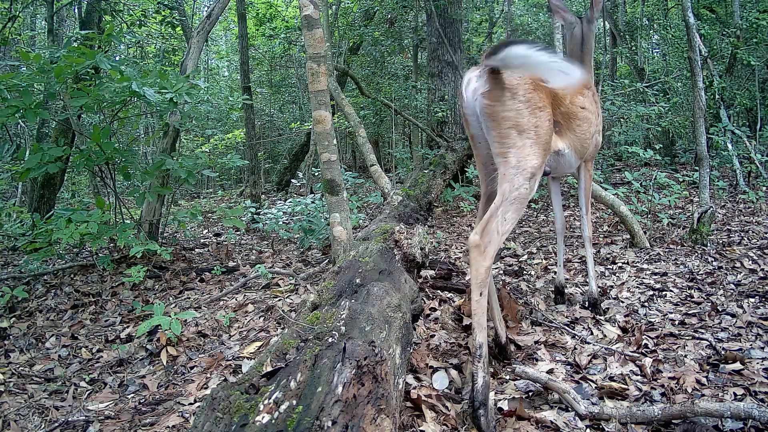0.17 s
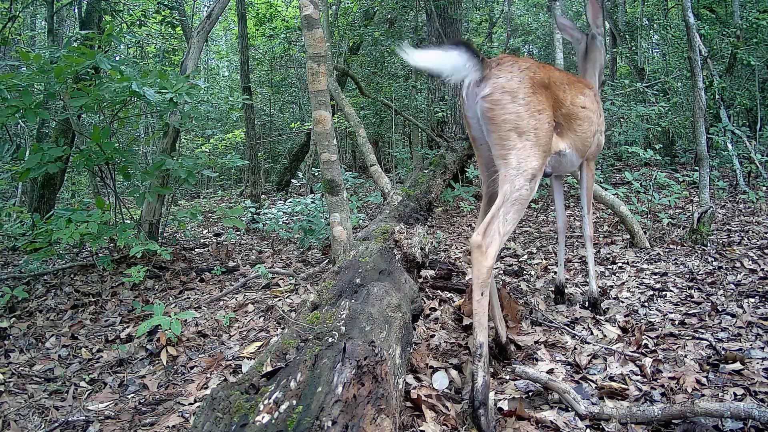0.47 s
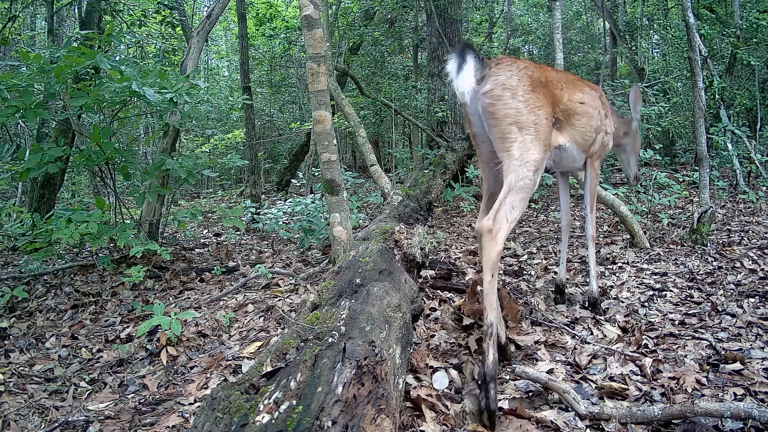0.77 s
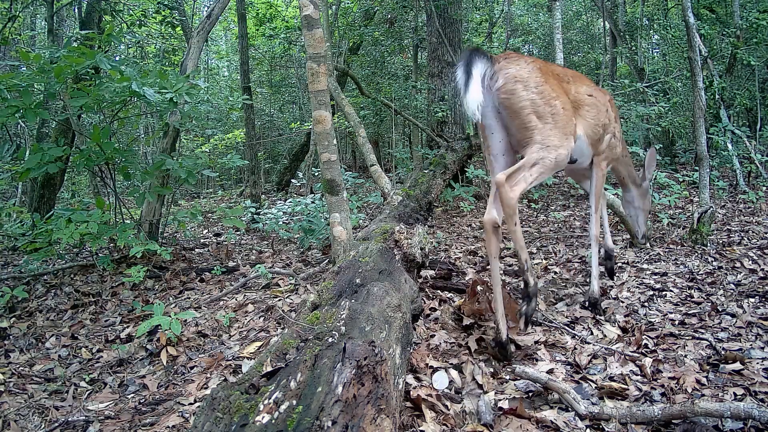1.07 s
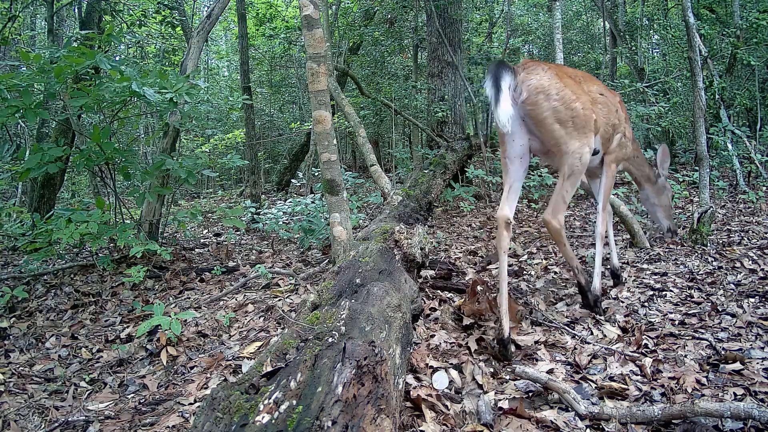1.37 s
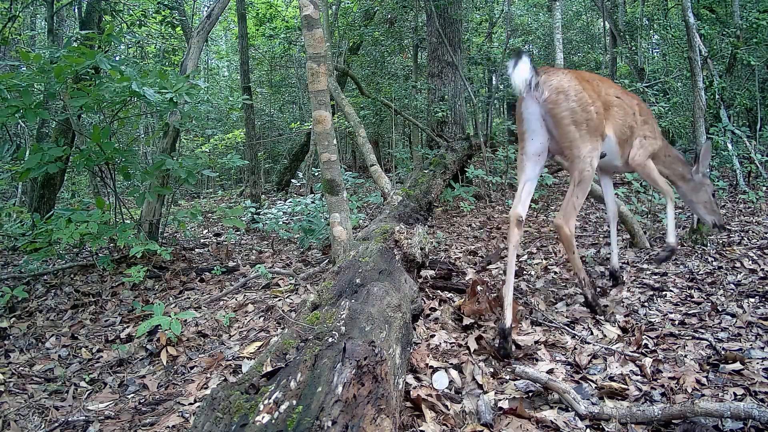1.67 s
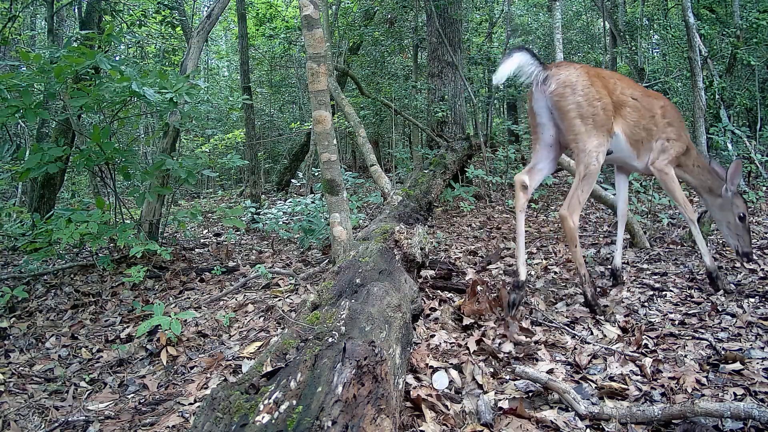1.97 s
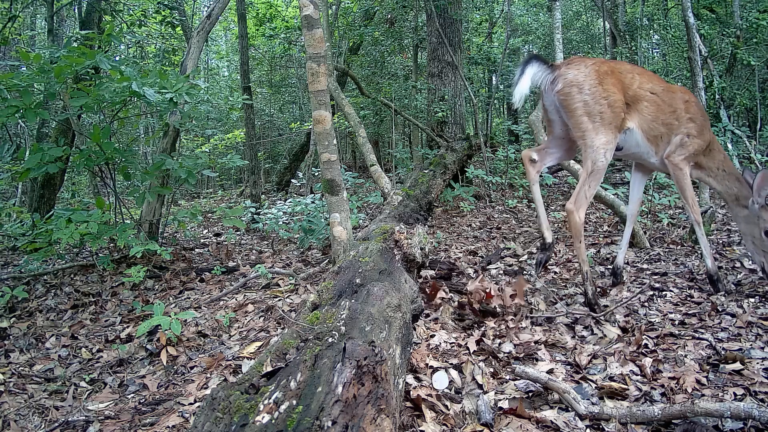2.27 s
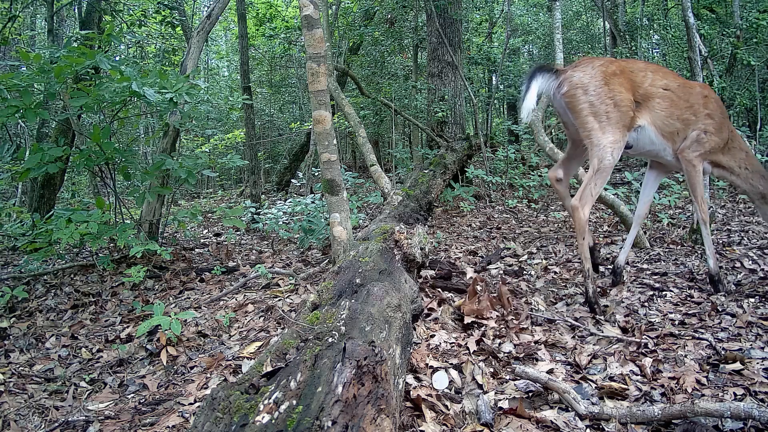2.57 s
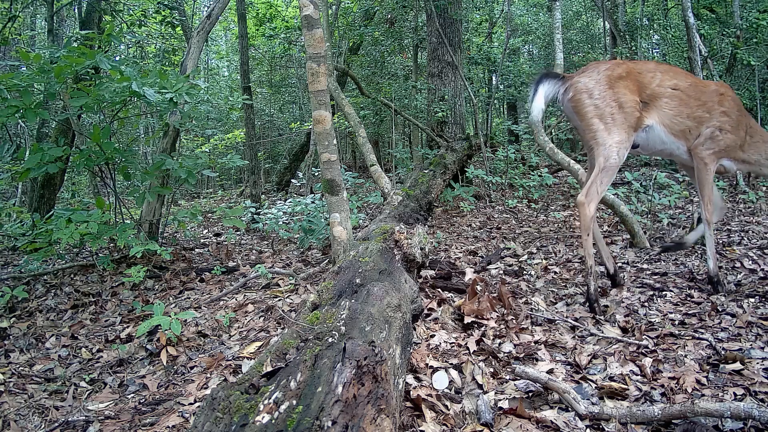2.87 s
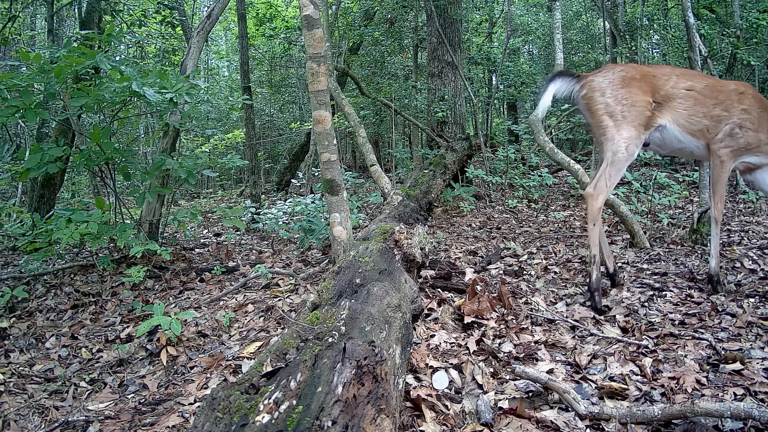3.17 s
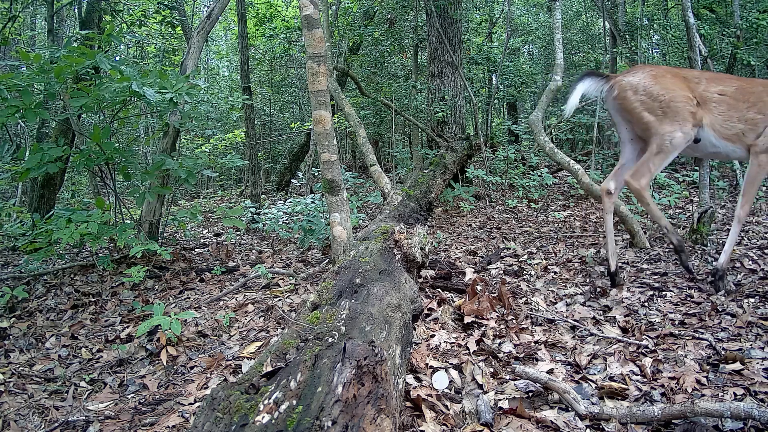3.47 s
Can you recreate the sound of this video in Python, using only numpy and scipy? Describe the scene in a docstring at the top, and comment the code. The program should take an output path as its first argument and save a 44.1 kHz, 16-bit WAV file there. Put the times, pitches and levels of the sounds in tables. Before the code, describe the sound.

Deer hooves crunch dry leaves and snap twigs over a low distant drone.

```python
"""Deer walking off over dry leaf litter

Hooves press filtered grains and tiny rings of leaf crackle; twigs snap as click, ring and dull body; wood knocks.
Far insects hiss as narrow noise over forest air, with an engine-like drone of wavering sines and noise rumble.
A thin, electronic-sounding whine of high partials creeps up in pitch."""
import sys
import numpy as np
from scipy import signal
from scipy.fft import rfft, irfft, next_fast_len
from scipy.io import wavfile
from scipy.ndimage import map_coordinates

SR = 44100
rng = np.random.default_rng(int(sys.argv[2]) if len(sys.argv) > 2 else 0)


def digitize_waveform(pressure):
    """Quantize a signal to 16-bit integers and store it at the path in sys.argv[1].

    Rows of a 2-D input are taken as channels; values are limited to [-1, 1].
    """
    field = np.atleast_2d(pressure).T
    bounded = np.clip(field, -1, 1)
    quanta = np.round(bounded * 32767).astype(np.int16)
    wavfile.write(sys.argv[1], SR, quanta)


N = 160083

# Weaker tones around the drone: pitch_hz, mean_level_db
HUMS = [(77, -54), (121, -60.5), (156, -68.5), (226, -68.5)]
# Drone level curve, before DRONE_GAIN_DB and waver: time_s, level_db
DRONE_LEVELS = [(0, -53.5), (1.4, -55), (1.85, -46), (2.1, -56.5), (2.6, -48), (3.15, -43), (3.4, -44.5),
                (3.63, -52.5)]
# Spectrum of the low rumble: freq_hz, relative_gain_db
RUMBLE_SPECTRUM = [(20, -18), (33, -16.5), (48, 2.5), (62, -3), (85, 1), (120, -2), (170, -8), (300, -25),
                   (700, -57.5)]
# Whine partials: pitch_multiple, base_level_db, swell_times_s, fade_times_s
WHINE_PARTIALS = [(8, -71, [.92, 1.02, 1.2, 1.48], []), (8.19, -73.5, [.15], []),
                  (9, -68.5, [.38, .78, 1.48, 2.7, 3.05], [1]), (10, -69.5, [1, 1.25, 1.65, 2.85], []),
                  (11, -65.5, [.05, .3, .62, .82], [2.2, 2.3]), (11.19, -64.5, [], [0.5]),
                  (11.5, -73.5, [.85, 2.1], []), (12, -63.5, [.4, 2.12, 2.75, 3.15], [0.61]),
                  (12.19, -65, [1.1], [.2]), (12.5, -73.5, [0.56, 2.5], [.3]), (13, -61, [0.58], [0, 1.89]),
                  (14, -70, [3.4, 3.5], [])]
# Spectrum of the forest air: freq_hz, relative_gain_db
AIR_SPECTRUM = [(100, -5), (250, 3), (450, 1), (800, -0.5), (1300, -2.5), (2000, -8.5), (3000, -10),
                (4500, -7), (6500, -10), (8500, -13)]
# Spectrum of the insect hiss: freq_hz, relative_gain_db
INSECT_SPECTRUM = [(4000, -30.5), (6000, -29), (7000, -5.5), (7300, -0.5), (7580, 4.5), (7750, -7),
                   (8100, -5.5), (8500, -17), (9000, -16)]
# Twigs and leaf stems breaking: start_s, nominal_level_db, ring_hz, body_db (sets dull body and crack)
SNAPS = [(0.559, -39, 5300, -20), (.782, -42, 1730, 0), (1.018, -38, 4140, -3), (1.330, -33, 3920, -12),
         (1.3476, -22, 3450, -15), (1.3488, -24, 5500, -14), (1.3504, -12.5, 3750, -16),
         (1.3512, -19, 4850, -20), (1.353, -21, 4130, -10), (1.3543, -20.5, 5100, -14),
         (1.3606, -25.5, 4540, -1), (1.4027, -30, 2830, -1), (1.4253, -25.5, 4650, -15),
         (1.4292, -27, 3380, -16), (1.5345, -42, 4600, -5), (1.544, -42, 5200, -5), (1.597, -37, 4230, -10),
         (1.6315, -39, 3600, -3), (1.689, -37, 3100, -8), (2.086, -36, 1950, -12),
         (2.0875, -33.5, 4300, -12), (2.130, -35, 2700, -5), (2.158, -31, 1870, -8),
         (2.160, -30.5, 3200, -8), (2.209, -34.5, 1270, -4), (2.2532, -32, 2800, -4),
         (2.2555, -31, 4200, -14), (2.259, -32.5, 3900, -6), (2.303, -33.5, 4120, -4),
         (2.322, -33.5, 2460, -3), (2.327, -32.5, 4800, -4), (2.358, -36, 4000, -6),
         (2.3915, -35, 3900, -12), (2.446, -25.5, 3500, -16), (2.6112, -32.5, 4600, -14),
         (2.634, -31, 5020, -9), (2.6393, -25, 4850, -5), (2.6397, -23.5, 2390, -15),
         (2.650, -30.5, 5030, -9), (2.754, -32, 4300, -10), (2.952, -38, 3770, -11), (3.28, -35, 3830, -20),
         (3.364, -33.5, 3800, -20), (3.3755, -22.5, 4550, -28), (3.379, -31, 3700, -20),
         (3.3818, -29, 3250, -20)]
# Bright part of a snap: freq_hz, relative_gain_db
CRACK_SPECTRUM = [(300, -9), (1500, -6), (3400, -5), (5300, -6.5), (6500, -7), (8000, -28.5)]
# Dull part of a snap: freq_hz, relative_gain_db
BODY_SPECTRUM = [(150, -24), (400, -7.5), (750, 10), (1800, -1), (3000, -10), (8000, -20)]
# Soft low thuds: start_s, length_s, pitch_hz, peak_db
THUDS = [(.564, 0.055, 65.3, -38), (3.03, 0.068, 58, -36)]
# Hooves in leaves: peak_s, level_db, rise_s, fall_s, soft_litter_db (relative, before LITTER_DB)
STEPS = [(.96, -58.5, 0.17, 0.16, 4), (1.075, -58.5, 0.025, 0.13, -8), (1.351, -44.5, 0.036, 0.046, 0),
         (1.425, -50.5, 0.047, 0.037, -4), (1.656, -52, 0.17, 0.11, 1), (2.14, -52.5, 0.2, 0.2, 2),
         (2.26, -49, 0.07, 0.072, -1), (2.349, -52, 0.14, 0.32, 1.5), (2.45, -57, 0.077, 0.11, -5.5),
         (2.56, -54, 0.21, 0.19, 2.5), (2.644, -49.5, 0.073, 0.15, -1.5), (2.76, -55.5, 0.068, 0.063, 1),
         (2.969, -55.5, 0.18, 0.15, 1.5), (3.38, -50.5, 0.052, 0.06, -4.5)]
# Crisp top layer of leaves: freq_hz, relative_gain_db
LEAF_SPECTRUM = [(300, -27.5), (1200, -17.5), (2400, -13.5), (4200, 5), (5300, 2), (7000, 3.5),
                 (8500, -19.5)]
# Soft litter beneath: freq_hz, relative_gain_db
LITTER_SPECTRUM = [(150, -11), (350, -1.5), (900, -6.5), (1700, -7.5), (3000, -10.5), (6000, -25)]
# Faint squeaks: start_s, length_s, pitch_hz, peak_db
SQUEAKS = [(2.2, 0.018, 897, -51), (1.975, 0.056, 1950, -52.5)]
# Hoof knocking on fallen wood: start_s, nominal_level_db
KNOCKS = [(2.123, -34.5)]
# Modes of the fallen wood: pitch_hz, relative_level_db, t60_s
WOOD_MODES = [(478, 2.5, 0.06), (1553, -8.5, .06), (1860, -11, 0.03)]
# Final treble roll-off: freq_hz, gain_db
ROLL_OFF = [(7900, 0), (8400, 0.5), (8800, -13), (9150, -48)]

DRONE_HZ, DRONE_GAIN_DB, DRONE_WAVER_DB, DRONE_DRIFT_RAD = 90.14, 1, 1.7, .42
RUMBLE_DB, AIR_DB, INSECTS_DB = -50, -52, -54.5
WHINE_START_HZ, WHINE_RISE_HZ_PER_S = 516.15, 1.32  # reference pitch that the partials multiply
WHINE_WAVER_DB, WHINE_WAVER_KNOTS_PER_S = 1.5, 6
SWELL_DB, FADE_DB, SWELL_WIDTH_S = 7, 9, .13
CLICK_DB, CRACK_DB, CRACK_DB_PER_BODY_DB, CRACK_T60_S = 2, -6.5, .4, .0036
SPLINTER_DB, SPLINTER_T60_S = -26, .024
BODY_GAIN_DB, BODY_T60_S = -4, .009
RING_T60_S, RING_ROUGH_RAD = .0115, 0.21
STEP_FADE_DB = 14.5  # drop over one rise_s or fall_s
CRACKLE_DB, CLUMP_DB, LITTER_DB = -1.5, 1.5, -2
GRAINS_PER_S, GRAIN_SPREAD_DB = 2600, 2.5
CRACKLES_PER_S, CRACKLE_CYCLES = 240, 20  # length and T60, in cycles
CRACKLE_HZ, CRACKLE_SPREAD_OCTAVES = 3890, 0.43
FOREST_DB, FOREST_T60_S = -17, 0.13
TOP_HZ = 9150


def amp(db):
    """Decibels to gain."""
    return 10 ** (np.asarray(db) / 20)


def unit(x):
    """Scale to rms 1."""
    return x / np.sqrt(np.mean(x ** 2) + 1e-20)


def wobble(knots_per_s):
    """Smooth random curve through normally distributed knots."""
    knots = rng.standard_normal(int(N * knots_per_s / SR) + 4)
    return map_coordinates(knots, [np.arange(N) * knots_per_s / SR])


def colour(x, spectrum):
    """Filter by (freq_hz, gain_db) points on a log frequency axis."""
    size = next_fast_len(N + 8192)
    freq_hz, gain_db = np.transpose(spectrum)
    log_bins = np.log(np.fft.rfftfreq(size, 1 / SR) + 1)
    gain = amp(np.interp(log_bins, np.log(freq_hz), gain_db))
    return irfft(rfft(x, size) * gain, size)[:N]


def noise(spectrum):
    """Coloured noise of rms 1."""
    return unit(colour(rng.standard_normal(N), spectrum))


def decay(t, t60_s):
    """Exponential fall of 60 dB in t60_s."""
    return np.exp(-np.log(1000) * t / t60_s)


def add(track, start_s, sound):
    """Mix a sound into the track, cut at the track's end."""
    part = track[round(start_s * SR):][:len(sound)]
    part += sound[:len(part)]


def tone(cycles, rms_db, drift_rad, knots_per_s):
    """Sine of given rms level and random start phase, its phase wandering."""
    phase = 2 * np.pi * (cycles + rng.random()) + drift_rad * wobble(knots_per_s)
    return np.sqrt(2) * amp(rms_db) * np.sin(phase)


def blips(rows):
    """Short sines under sine-squared envelopes."""
    out = np.zeros(N)
    for start_s, length_s, pitch_hz, peak_db in rows:
        t = np.arange(int(length_s * SR)) / SR
        envelope = np.sin(np.pi * t / length_s) ** 2
        add(out, start_s, amp(peak_db) * envelope * np.sin(2 * np.pi * pitch_hz * t))
    return out


def drone():
    """Distant low sine of wavering level and phase, with weaker unsteady hums."""
    t = np.arange(N) / SR
    level_db = np.interp(t, *np.transpose(DRONE_LEVELS)) + DRONE_GAIN_DB + DRONE_WAVER_DB * wobble(11)
    out = tone(DRONE_HZ * t, level_db, DRONE_DRIFT_RAD, knots_per_s=4.8)
    for pitch_hz, hum_db in HUMS:
        out += tone(pitch_hz * t, hum_db + 2.15 * wobble(5.1), drift_rad=1.0, knots_per_s=5.934)
    return out


def rumble():
    """Steady low-frequency noise."""
    return amp(RUMBLE_DB) * noise(RUMBLE_SPECTRUM)


def whine():
    """High partials glide up together; each wavers, swells and fades on its own."""
    t = np.arange(N) / SR
    cycles = np.cumsum(WHINE_START_HZ + WHINE_RISE_HZ_PER_S * t) / SR

    def bumps(times_s):
        """Sum of bell curves centred on the given times."""
        return sum(np.exp(-((t - time_s) / SWELL_WIDTH_S) ** 2) for time_s in times_s)

    out = np.zeros(N)
    for multiple, base_db, swells_s, fades_s in WHINE_PARTIALS:
        level_db = base_db + SWELL_DB * bumps(swells_s) - FADE_DB * bumps(fades_s)
        level_db = level_db + WHINE_WAVER_DB * wobble(WHINE_WAVER_KNOTS_PER_S)
        out += tone(multiple * cycles, level_db, drift_rad=0.21, knots_per_s=18)
    return out


def forest_air():
    """Broad noise of slightly wavering level."""
    return amp(AIR_DB + 0.18 * wobble(4.15)) * noise(AIR_SPECTRUM)


def insects():
    """Far insects merge into a narrow, high, slightly wavering hiss."""
    return amp(INSECTS_DB + 0.75 * wobble(9)) * noise(INSECT_SPECTRUM)


def snaps():
    """A break clicks and cracks, rings briefly, thumps dully and trails splinters; more body adds crack."""
    out, t = np.zeros(N), np.arange(SR // 20) / SR
    bright = np.tanh(noise(CRACK_SPECTRUM)) / 0.65
    dull = np.tanh(noise(BODY_SPECTRUM)) / 0.65
    impulse = np.arange(N) == SR // 2000  # 0.5 ms in
    click = colour(impulse, CRACK_SPECTRUM)[:len(t)]
    click = amp(CLICK_DB) * click / click.max()
    onset = 1 - np.exp(-t / 0.00018)
    for start_s, level_db, ring_hz, body_db in SNAPS:
        here = slice(round(start_s * SR), round(start_s * SR) + len(t))
        roughness = RING_ROUGH_RAD * dull[here][::-1]
        ring = np.sin(2 * np.pi * ring_hz * t + roughness) * decay(t, RING_T60_S)
        crack = click + bright[here] * decay(t, CRACK_T60_S)
        crack = amp(CRACK_DB + CRACK_DB_PER_BODY_DB * body_db) * crack
        splinters = amp(SPLINTER_DB) * bright[here] * decay(t, SPLINTER_T60_S)
        body = amp(body_db + BODY_GAIN_DB) * dull[here] * decay(t, BODY_T60_S)
        add(out, start_s, amp(level_db) * onset * (0.63 * ring + crack + splinters + body))
    return out


def thuds():
    """Soft low thuds as brief bass sines."""
    return blips(THUDS)


def grains(spectrum):
    """Dense rain of tiny fractures of random sign and uneven size, rms 1."""
    size_db = GRAIN_SPREAD_DB * np.minimum(rng.exponential(size=N), 2.5)
    sizes = amp(size_db) * rng.choice([-1, 1], N)
    hits = rng.random(N) < GRAINS_PER_S / SR
    return unit(colour(sizes * hits, spectrum))


def crackles():
    """Single leaves buckle, each with a tiny ring of its own pitch; rms 1."""
    out = np.zeros(N)
    for when, pitch, size in rng.random((int(CRACKLES_PER_S * N / SR), 3)):
        spread = np.clip(np.log(pitch / (1 - pitch)) / 2, -3, 2)  # logistic
        pitch_hz = CRACKLE_HZ * 2 ** (CRACKLE_SPREAD_OCTAVES * spread)
        length_s = CRACKLE_CYCLES / pitch_hz
        t = np.arange(int(SR * CRACKLE_CYCLES / pitch_hz)) / SR
        gain = amp(-GRAIN_SPREAD_DB * np.log(size + .08))
        add(out, when * N / SR, gain * np.sin(2 * np.pi * pitch_hz * t) * decay(t, length_s))
    return unit(out)


def leaves():
    """Under each hoof, crisp leaves crackle in clumps and the softer litter beneath gives way."""
    t = np.arange(N) / SR
    crisp, soft = np.zeros(N), np.zeros(N)
    for peak_s, level_db, rise_s, fall_s, litter_db in STEPS:
        distance = np.maximum((peak_s - t) / rise_s, (t - peak_s) / fall_s)
        press = amp(level_db - STEP_FADE_DB * distance)
        crisp = np.hypot(crisp, press)  # steps add in power
        soft = np.hypot(soft, press * amp(litter_db))
    clumps = unit(amp(CLUMP_DB * wobble(70)))
    top_layer = crisp * (grains(LEAF_SPECTRUM) + amp(CRACKLE_DB) * crackles())
    return clumps * (top_layer + amp(LITTER_DB) * soft * grains(LITTER_SPECTRUM))


def squeaks():
    """Faint squeaks as brief sines."""
    return blips(SQUEAKS)


def knocks():
    """A fallen branch rings briefly in a few decaying modes."""
    out, t = np.zeros(N), np.arange(SR // 4) / SR
    onset = 1 - np.exp(-t / 0.0011)
    ring = np.zeros(len(t))
    for pitch_hz, mode_db, t60_s in WOOD_MODES:
        ring += amp(mode_db) * np.sin(2 * np.pi * pitch_hz * t) * decay(t, t60_s)
    for start_s, level_db in KNOCKS:
        add(out, start_s, amp(level_db) * ring * onset)
    return out


def forest_echo(x):
    """Trunks scatter a short, weak echo: convolution with decaying noise."""
    t = np.arange(SR // 2) / SR
    tail = rng.standard_normal(len(t)) * decay(t, FOREST_T60_S) * (1 - np.exp(-t / 0.0047))
    return amp(FOREST_DB) * signal.fftconvolve(x, tail / np.linalg.norm(tail))[:N]


def scene():
    """The deer's sounds and their echo over thuds and background."""
    background = drone() + rumble() + whine() + forest_air() + insects()
    deer = snaps() + leaves() + squeaks() + knocks()
    return (background + deer + forest_echo(deer) + thuds())[None]


def record(dry):
    """Roll off the treble and remove everything from TOP_HZ up."""
    spectrum = rfft(colour(dry[0], ROLL_OFF), 2 * N)
    in_band = np.fft.rfftfreq(2 * N, 1 / SR) < TOP_HZ
    return irfft(spectrum * in_band)[None, :N]


dry = scene()
out = record(dry)
digitize_waveform(out)
```